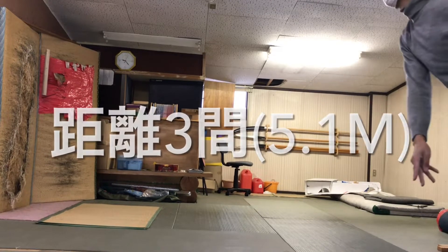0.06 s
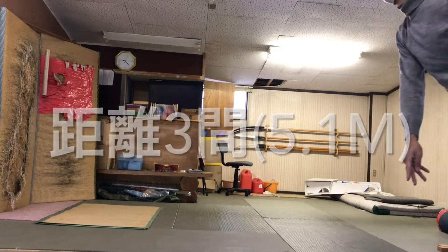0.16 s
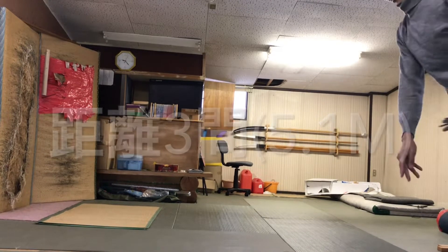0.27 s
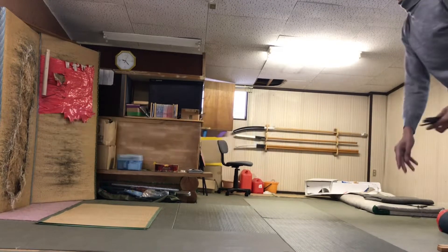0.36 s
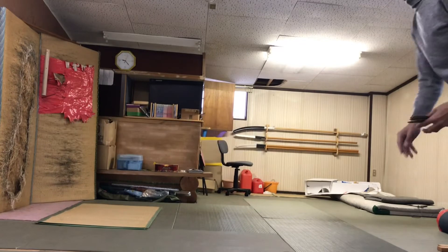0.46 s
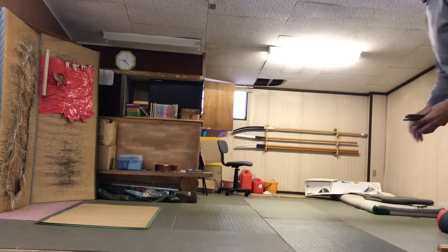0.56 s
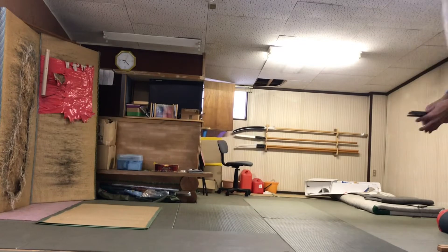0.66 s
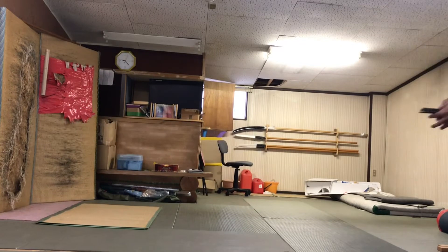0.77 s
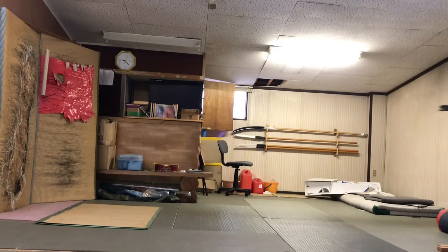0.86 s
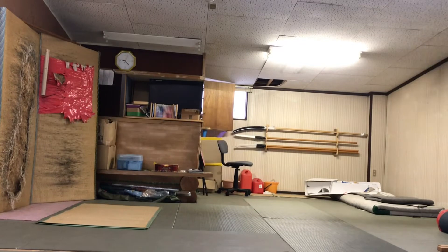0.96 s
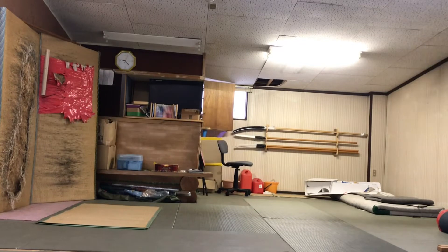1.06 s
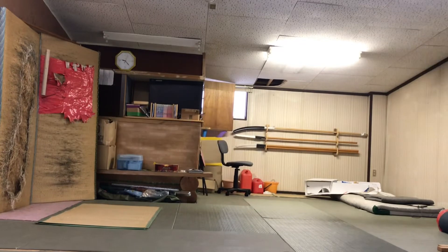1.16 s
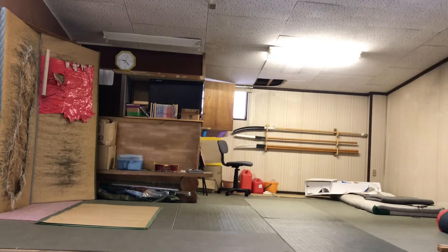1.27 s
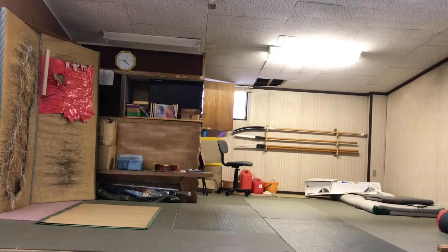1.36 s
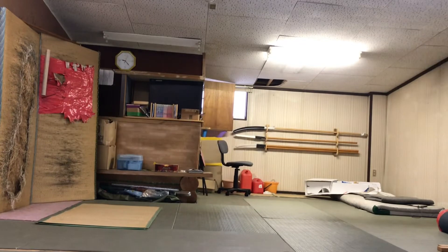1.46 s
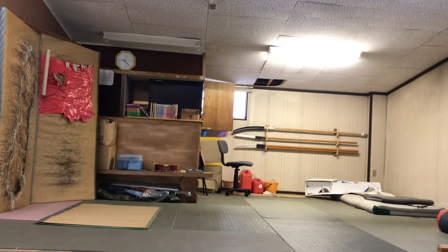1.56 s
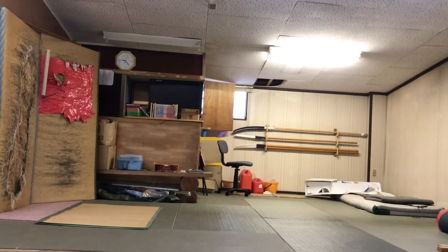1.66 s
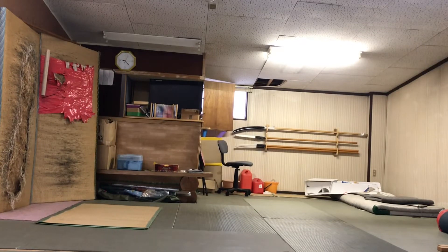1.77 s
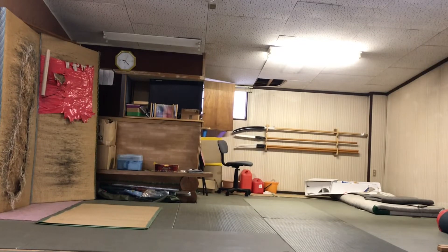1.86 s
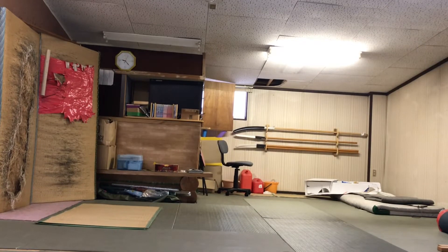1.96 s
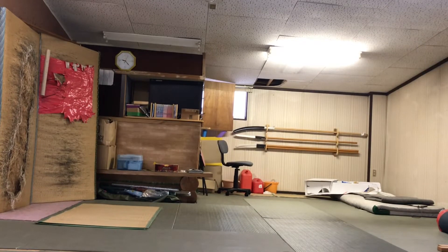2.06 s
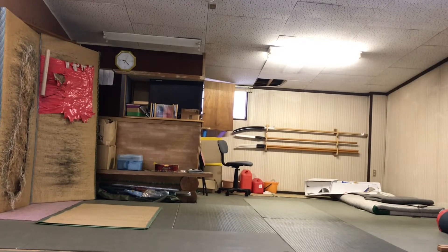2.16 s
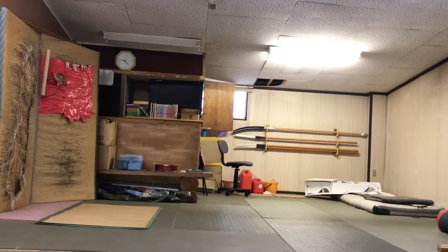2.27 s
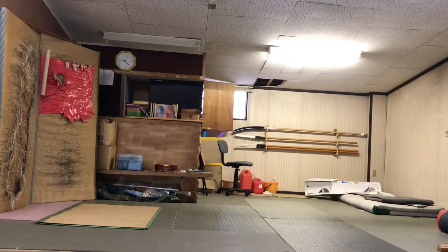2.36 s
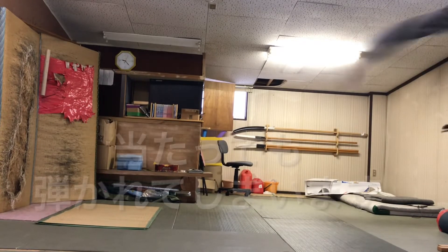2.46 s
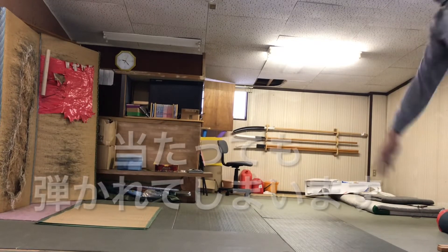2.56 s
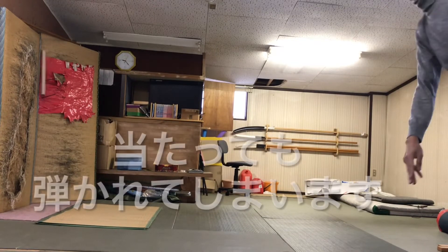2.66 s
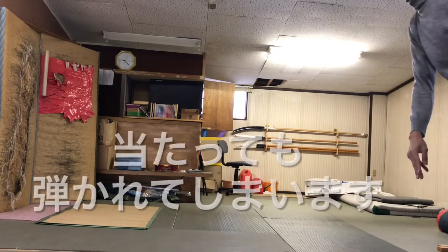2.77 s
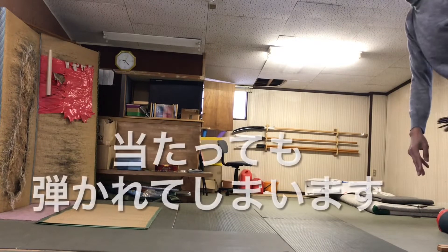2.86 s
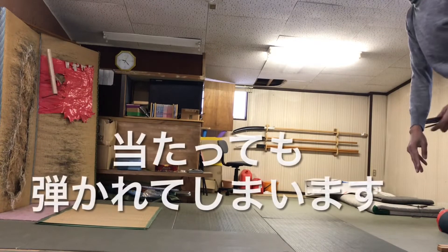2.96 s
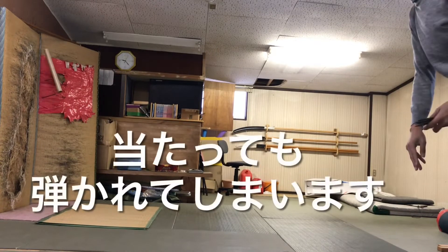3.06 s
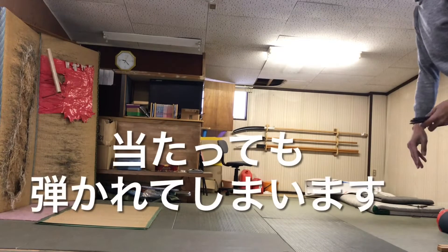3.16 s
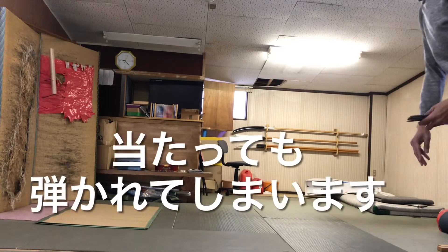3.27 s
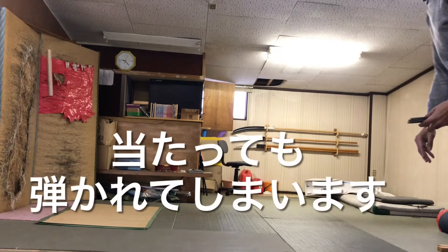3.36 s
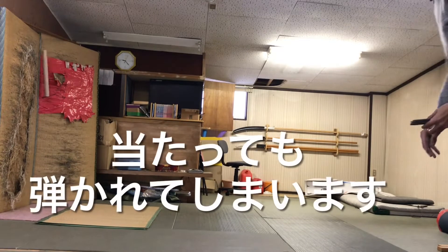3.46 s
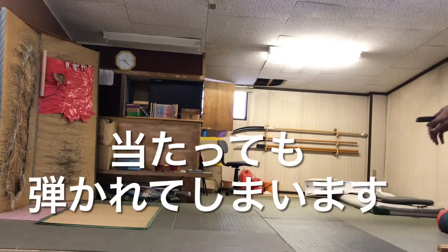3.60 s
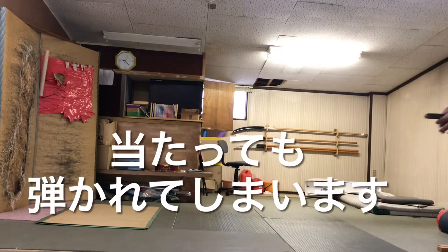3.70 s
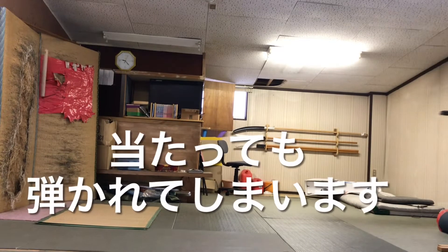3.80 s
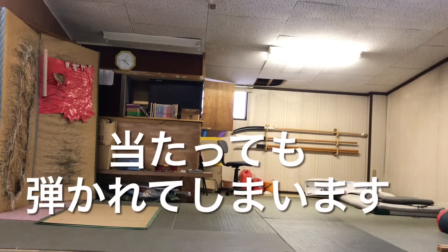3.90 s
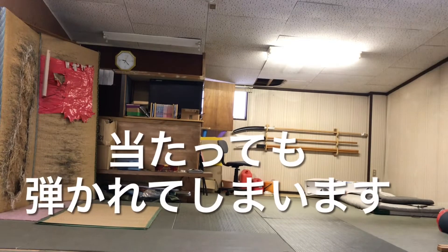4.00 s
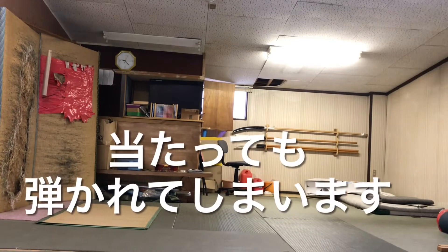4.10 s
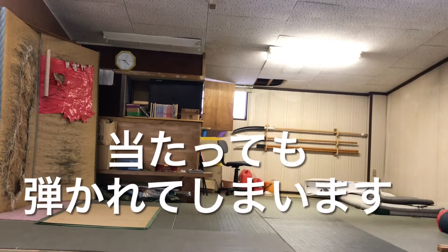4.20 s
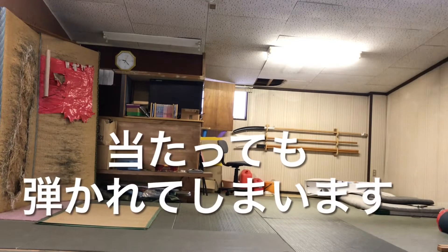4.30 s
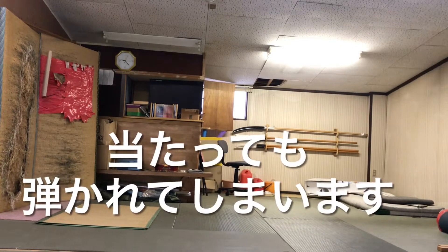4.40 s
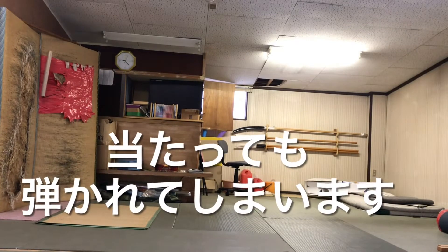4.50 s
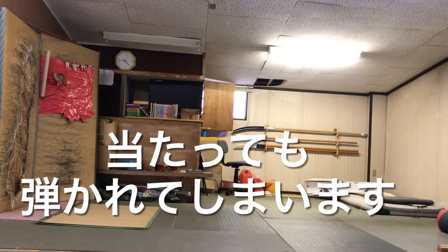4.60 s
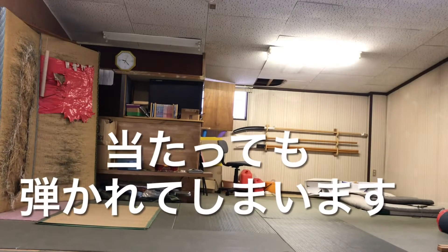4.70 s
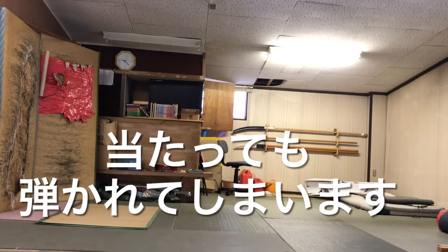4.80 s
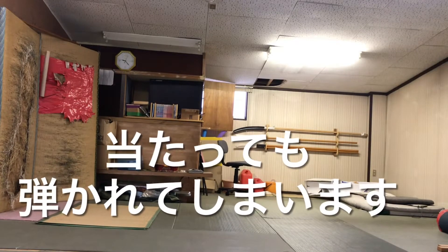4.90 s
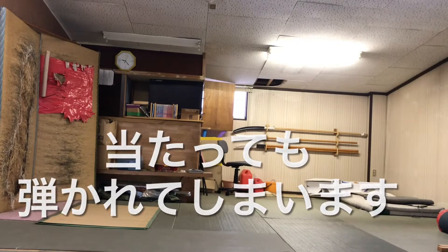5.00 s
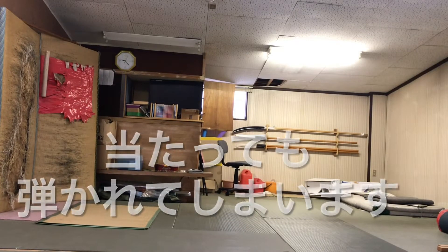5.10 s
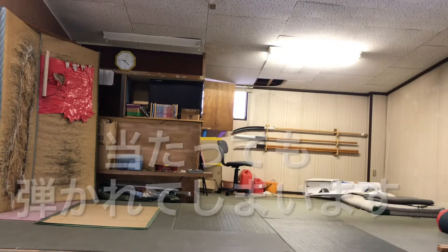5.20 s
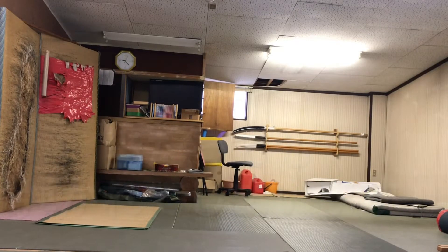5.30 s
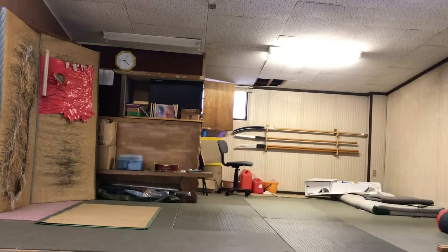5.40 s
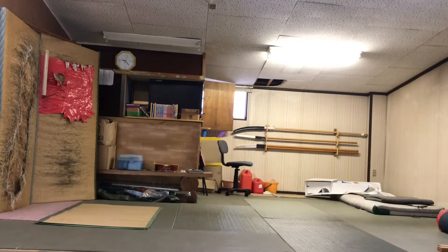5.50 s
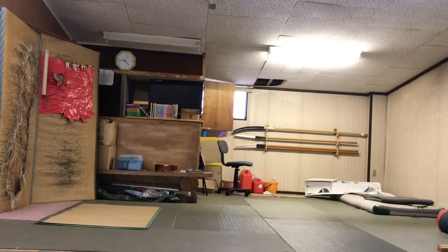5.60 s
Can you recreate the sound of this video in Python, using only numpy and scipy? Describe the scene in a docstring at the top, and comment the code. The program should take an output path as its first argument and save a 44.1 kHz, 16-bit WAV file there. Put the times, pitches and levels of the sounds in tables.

```python
"""Small hall: a steel throwing spike clacks off a hanging cardboard tube, tumbles ringing to the mat,
bounces and slides. Feet scuff the mats and small steel ticks and clinks sound over a low rumble and air.
Blows are short filter responses, tube, boards and steel are decaying modes, rubs are shaped noise;
the hall answers each event with smeared echoes and a diffuse tail."""
import sys
import numpy as np
from scipy import signal
from scipy.fft import rfft, irfft, next_fast_len
from scipy.io import wavfile
from scipy.ndimage import uniform_filter1d

SR = 44100
rng = np.random.default_rng(int(sys.argv[2]) if len(sys.argv) > 2 else 0)


def file_out(sig):
    """Save sig as 16-bit WAV at sys.argv[1]."""
    # one column per channel
    cols = np.atleast_2d(sig).T
    # limit, then scale
    lim = np.clip(cols, -1, 1)
    pcm = np.round(lim * 32767).astype(np.int16)
    wavfile.write(sys.argv[1], SR, pcm)


N = 249165
LEAD = SR // 10  # samples ahead of time zero, cut off in scene()

# tick of the steel: (frequency [Hz], relative level [dB])
TICK_COLOUR = [(1000, -37), (3000, 7.5), (5000, 4.5), (9000, 4.5), (12000, 7.5), (14000, 7), (16000, 16)]


def undb(db):
    """Decibels to amplitude."""
    return 10 ** (np.asarray(db) / 20)


def unit(x):
    """Scale to rms 1."""
    return x / np.sqrt(np.mean(x ** 2))


def over_hz(table, hz):
    """Table values joined on a log-frequency axis."""
    table_hz, values = np.transpose(table)
    return np.interp(np.log(np.maximum(hz, 1)), np.log(table_hz), values)


def band(centre_hz, width_hz, size, order=2):
    """Band-passed noise, rms 1; the centre is the geometric mean of the edges."""
    low_hz = np.sqrt(centre_hz ** 2 + width_hz ** 2 / 4) - width_hz / 2
    high_hz = min(low_hz + width_hz, .45 * SR)
    sos = signal.butter(order, [low_hz, high_hz], "bandpass", fs=SR, output="sos")
    return unit(signal.sosfilt(sos, rng.standard_normal(size)))


def above(x, low_hz):
    """High-pass: removes the low click of sounds that start abruptly."""
    return signal.sosfilt(signal.butter(3, low_hz, "highpass", fs=SR, output="sos"), x)


def blow(colour, size=4096, rough=.45):
    """One contact: minimum-phase response of the given colour, spread by three allpasses; peak 1."""
    bins_hz = np.arange(size // 2 + 1) * SR / size
    # folding the cepstrum makes the response causal
    cepstrum = irfft(np.log(undb(over_hz(colour, bins_hz))))
    cepstrum[1:size // 2] *= 2
    cepstrum[size // 2 + 1:] = 0
    y = irfft(np.exp(rfft(cepstrum)))
    for lag in rng.integers(3, 20, size=3):
        # an allpass spreads the blow in time and leaves its colour
        a = np.r_[1, np.zeros(lag - 1), -rough]
        y = signal.lfilter(a[::-1], a, y)
    return y / np.abs(y).max()


def ring(modes, length_s):
    """Decaying sines (Hz, dB, t60 s), random starting phases, 4 ms fade at the end."""
    t = np.arange(int(length_s * SR)) / SR
    hz, db, t60_s = np.transpose(modes)[:, :, None]
    phase = 2 * np.pi * rng.random((len(modes), 1))
    decay = (hz < .45 * SR) * undb(db - 60 * t / t60_s)
    waves = decay * np.sin(2 * np.pi * hz * t + phase)
    return waves.sum(0) * np.minimum(1, (length_s - t) / .004)


def spike(db, bright_db, low_db, t60_s, third_hz, length_s, split=.003):
    """One steel bar bending in two planes at slightly different pitches; bright_db tilts the upper modes."""
    # bending modes of a free bar, scaled to third_hz: frequency [Hz]
    bar_hz = [872, 2350, 4497, 7245, 10645, 14575, 19000]
    # the same modes: (relative level [dB], share of t60 [ratio])
    bar = [(-20, .6), (0, 1), (0, 1.3), (-4, .9), (-6, .8), (-4, .75), (-8, .6)]
    modes = []
    for hz, (mode_db, share) in zip(bar_hz, bar):
        octave = np.log2(hz / bar_hz[2])
        tilt_db = bright_db * octave if octave >= 0 else low_db
        pitch_hz = hz * third_hz / bar_hz[2]
        for side in (-1, 1):
            modes.append((pitch_hz * (1 + side * split), db + mode_db + tilt_db, t60_s * share))
    return ring(modes, length_s)


def add(track, s, sound):
    """Mix a sound into the track at s seconds."""
    i = LEAD + int(s * SR)
    track[i:i + len(sound)] += sound[:len(track) - i]


def hall(x, wet_db, echoes=(), scatter_s=.0005):
    """Direct sound, echoes smeared by rough walls, and a diffuse tail with t60 set by frequency."""
    # tail decay: (frequency [Hz], t60 [s])
    hall_t60 = [(60, 1), (250, 0.42), (1000, 0.37), (2500, 0.54), (5000, 0.45), (9000, 0.36), (15000, 0.21)]
    t = np.arange(int(.9 * SR)) / SR
    tail = np.zeros(len(t))
    for hz in 50 * 2 ** np.arange(0, 8.6, .5):
        tail += np.sqrt(hz) * band(hz, hz / 2.7, len(t)) * undb(-60 * t / over_hz(hall_t60, hz))
    tail *= 1 - np.exp(-t / 0.0074)  # gradual build-up
    tail *= undb(wet_db) / np.sqrt(np.sum(tail ** 2))
    tail[0] = 1  # direct sound
    for delay_s, db in echoes:
        smear = rng.standard_normal(len(t)) * (t >= delay_s) * np.exp(-np.abs(t - delay_s) / scatter_s)
        tail += undb(db) * smear / np.sqrt(np.sum(smear ** 2))
    return signal.fftconvolve(x, tail)[:len(x)]


def background():
    """Room air and microphone hiss as shaped noise, a wavering low rumble and a fainter murmur near 250 Hz."""
    # air and hiss: (frequency [Hz], relative density [dB])
    air_colour = [(53, -30), (90, -4), (210, -9.5), (249, -20.5), (303, -19), (593, -16), (647, -21),
                  (1020, -22), (16000, -35.5)]
    # low rumble with the low tails of the blows: (time [s], level before waver [dB])
    rumble = [(0.0, -56), (0.05, -54), (0.24, -80), (1.12, -63), (1.16, -75.5), (2.2, -59.5), (2.49, -74),
              (2.52, -55), (2.66, -68), (2.74, -50), (2.93, -64.5), (4.53, -52.5), (4.56, -63.5),
              (4.99, -45), (5.27, -60), (5.33, -52.5), (5.6, -51), (5.65, -54)]
    # murmur of noise around 250 Hz: (time [s], level [dB])
    murmur = [(0, -66), (1.6, -71.5), (3.2, -64.5), (4.3, -68), (5.0, -63.5), (5.65, -65)]
    air_db, waver_hz, waver_db = -67.5, 6, 2.5
    size = next_fast_len(N)
    hz = np.arange(size // 2 + 1) * SR / size
    spectrum = rfft(rng.standard_normal(size)) * undb(over_hz(air_colour, hz)) * (hz > 30)
    air = unit(irfft(spectrum, size)[:N])
    t = np.arange(N) / SR
    waver = band(waver_hz, waver_hz, N, order=1)
    rumble_db = np.interp(t, *np.transpose(rumble)) + waver_db * waver
    low = undb(rumble_db) * band(52, 32, N, order=3)
    mid = undb(np.interp(t, *np.transpose(murmur))) * band(250, 180, N, order=1)
    return undb(air_db) * air + low + mid


def landings():
    """Spike on mat or board: dull thud, ringing boards, bright steel tick; first an earlier blow dies away."""
    # contacts: (time [s], thud level [dB], tick level [dB])
    contacts = [(3.3711, -17, -14), (3.6726, -35.5, -24.5), (3.85, -70, -50), (3.917, -74, -47),
                (4.112, -47, -42), (4.118, -63, -45)]
    # blow of an earlier throw: (frequency [Hz], relative level [dB])
    earlier_colour = [(47, -56), (80, -16.5), (563, 0), (820, -10), (958, -9.5), (1400, -12), (2040, -14),
                      (2900, -16.5), (9000, -24.5), (16000, -19)]
    # mat thud: (frequency [Hz], relative level [dB])
    thud_colour = [(47, -61), (80, -33), (128, -6), (346, -10.5), (496, -15), (616, 1), (2430, -16),
                   (2860, -18), (6000, -24), (7800, -35), (13200, -120)]
    # boards under the mat: (frequency [Hz], relative level [dB], t60 [s])
    boards = [(154.4, -11, 0.12), (208.4, -9.5, 0.17), (245.6, -5.5, 0.13), (343.6, -4.5, 0.072),
              (419, -6, 0.067), (596, -8.5, 0.072), (798, -10, 0.069)]
    # first echoes: (delay [s], level [dB])
    mat_echoes = [(.0052, -4), (.014, -8), (.0205, -3), (.0252, -6), (.033, -8), (.0365, -8)]
    earlier_s, earlier_peak_db = -0.046, -17
    boards_re_thud_db, mat_low_hz = -0.5, 123
    mat_wet_db, boards_wet_db = 10, -2
    x, before, floor = np.zeros((3, N + LEAD))
    add(before, earlier_s, undb(earlier_peak_db) * blow(earlier_colour))
    for s, thud_db, tick_db in contacts:
        add(x, s, undb(thud_db) * blow(thud_colour))
        add(floor, s, undb(thud_db + boards_re_thud_db) * ring(boards, .3))
        add(x, s, undb(tick_db) * blow(TICK_COLOUR))
    contact_wet = hall(before + above(x, mat_low_hz), mat_wet_db, mat_echoes)
    return contact_wet + hall(above(floor, mat_low_hz), boards_wet_db)


def clinks():
    """Small steel ticks and clinks: quickly damped bars, with a wavering level."""
    # touches: (time [s], ring level before waver [dB], brightness [dB per octave], low modes [dB],
    # t60 [s], third mode [Hz], tick level [dB])
    touches = [(0.881, -69.5, 14, -30, 0.058, 4540, -29.5), (0.8797, -80, 19, -24, 0.046, 4000, -52),
               (0.881, -68, 0, -28, 0.041, 5170, -62), (1.0555, -75, 11.5, -26, 0.12, 4980, -31),
               (3.0703, -41, -7, -11, 0.022, 4530, -29), (5.145, -70, -2.5, -28.5, 0.13, 5200, -69),
               (5.403, -76, -3.5, 2, 0.13, 4783, -37), (5.405, -72, 11.5, -31, 0.085, 5030, -66),
               (5.441, -76.5, 4.5, 4.5, 0.23, 4725, -41), (5.536, -59, 13, -31, 0.073, 4790, -26),
               (5.548, -76, -3, -1, 0.087, 4762, -46), (5.591, -74, 11, -34, 0.085, 4520, -48.5)]
    # first echoes: (delay [s], level [dB])
    clink_echoes = [(.003, -4.5), (.007, -2.5), (0.012, -4), (0.02, -14)]
    tick_low_hz, clink_wet_db, waver_db = 4100, 2, 2.34
    rings, ticks = np.zeros((2, N + LEAD))
    for s, *contact, tick_db in touches:
        add(rings, s, spike(*contact, 0.34, split=0.0049))
        add(ticks, s, undb(tick_db) * blow(TICK_COLOUR))
    waver = undb(waver_db * band(82, 145, N + LEAD, order=1))
    return hall(rings * waver + above(ticks, tick_low_hz), clink_wet_db, clink_echoes)


def rubs(catch_db=0.5, catch_s=0.011):
    """Feet, sleeve and spike rub woven stuff: the weave catches and slips, the ridge hum sinks as it slows."""
    # strokes: (start [s], rise [s], hold [s], fade [dB per s], ridge pitch at full level [Hz],
    # hum half width [Hz], hum [dB], rasp [dB], hiss [dB], low drag [dB])
    strokes = [(1.06, 0.053, .06, 61, 742, 151, -58, -55.5, -60.5, -78),
               (1.167, .07, 0.037, 151, 981, 150, -55, -61, -80, -89),
               (1.316, 0.02, 0.037, 170, 903, 140, -54.5, -56, -61.5, -62.5),
               (2.211, 0.024, 0.018, 116.5, 577, 200, -73, -71.5, -68, -88),
               (2.389, 0.024, 0.0078, 145.5, 585, 200, -70, -66, -67, -90),
               (2.437, .04, .07, 90, 572, 50.4, -54.5, -65, -61, -61),
               (2.596, 0.11, 0.08, 200, 584, 250, -64.5, -56.5, -61, -49.5),
               (3.519, 0.016, .01, 295.5, 900, 400, -54, -55, -64, -64),
               (3.617, .03, .02, 153, 951, 400, -47, -50.5, -66, -69),
               (3.723, 0.016, 0.0085, 200.5, 1000, 400, -50, -50, -74, -66),
               (3.801, 0.042, .02, 120, 998, 400, -44, -48.5, -54, -65),
               (3.889, .04, .02, 111, 1005, 394, -45, -47, -54, -80),
               (4.025, 0.026, 0.041, 100, 950.5, 344, -45, -48, -52, -72),
               (4.101, 0.022, 0.0084, 398.5, 996, 400, -43.5, -46, -41.5, -72),
               (4.167, .02, .15, 89.5, 900.6, 350, -58, -56.5, -58, -64)]
    # rasp, hiss, drag: (centre [Hz], width [Hz])
    rub_bands = [(3060, 4400), (11800, 14000), (230, 240)]
    start_db, end_db = -18, -30  # relative to full level
    sag, wet_db = .2, -11  # sag: share of pitch lost at end_db
    x = np.zeros(N + LEAD)
    for s, rise_s, hold_s, fade, ridge_hz, half_width_hz, hum_db, *levels_db in strokes:
        corners_s = np.cumsum([0, rise_s, hold_s, -end_db / fade])
        t = np.arange(0, corners_s[-1], 1 / SR)
        stroke_db = np.interp(t, corners_s, [start_db, 0, 0, end_db])
        catch = unit(uniform_filter1d(rng.standard_normal(len(t)), int(catch_s * SR)))
        # hum: slow noise carried on the ridge frequency
        phase = 2 * np.pi * np.cumsum(ridge_hz * (1 - sag * stroke_db / end_db)) / SR
        b, a = signal.butter(1, half_width_hz, fs=SR)
        slow = signal.lfilter(b, a, rng.standard_normal((2, len(t))))
        mix = undb(hum_db) * unit(slow[0] * np.cos(phase) + slow[1] * np.sin(phase))
        for (hz, width_hz), db in zip(rub_bands, levels_db):
            mix += undb(db) * band(hz, width_hz, len(t))
        add(x, s, mix * undb(stroke_db + catch_db * catch))
    return hall(x, wet_db)


def thrown():
    """The spike rings, each contact stopping the ring before; uneven tumbling makes the level flutter."""
    # contacts: (time [s], level before flutter [dB], brightness [dB per octave], low modes [dB],
    # t60 [s], third mode [Hz])
    contacts = [(2.461, -79.5, 11.5, -15, 1.3, 4394), (2.7002, -54.5, -7.5, -2.5, 3.6, 4473),
                (3.0705, -63, -24, -3, 2.5, 4434), (3.372, -51.5, 2.5, -3, 1.8, 4520),
                (3.6734, -59, 1, -20, 3.2, 4476), (4.118, -42, 3, -13, 0.12, 4497)]
    tumble_hz, tumble_db, wet_db = 45, 2.5, -10
    x = np.zeros(N + LEAD)
    ends_s = [row[0] for row in contacts[1:]] + [contacts[-1][0] + .4]
    for (s, *contact), end_s in zip(contacts, ends_s):
        add(x, s, spike(*contact, end_s - s))
    flutter = undb(tumble_db * band(tumble_hz, tumble_hz, len(x), order=1))
    return hall(x * flutter, wet_db)


def tube():
    """The tip cracks on cardboard, the tube wall rings and the padded board behind booms late."""
    # crack: (frequency [Hz], relative level [dB])
    clack_colour = [(59, -64.5), (100, -36.5), (302, -29.5), (676, -6.5), (872, -23), (1100, -6),
                    (1420, -17), (1950, -12), (2170, -18), (3050, -9.5), (4290, -17.5), (4870, -13),
                    (16000, -27)]
    # tube wall modes: frequency [Hz]
    wall_hz = [250, 500, 727, 1100, 1222, 2003, 2464, 2735, 2832, 2947, 3096, 3690]
    # the same modes: (relative level [dB], t60 [s])
    wall_modes = [(-17.5, 0.049), (-5.5, 0.036), (-18, 0.084), (0.5, 0.15), (-15.5, 0.058), (-9, 0.12),
                  (-7.5, .06), (-10.5, .04), (-17.5, .04), (-10.5, 0.078), (-7.5, 0.16), (-15.5, 0.027)]
    # padded board: (frequency [Hz], level before build-up [dB], t60 [s])
    backing = [(62.1, -50, 0.22), (88, -47.5, 0.19), (120, -51.5, 0.11)]
    # first echoes: (delay [s], level [dB])
    tube_echoes = [(.0012, -1), (.0026, -1), (.0087, 0), (.0105, -1), (.0195, -4), (.0275, -5), (.044, -10)]
    clack_s, clack_peak_db, wall_db = 2.6992, -0.88, -10
    backing_lag_s, wall_low_hz = .012, 190
    crack_wet_db, wall_wet_db = 6, -3
    crack, wall = np.zeros((2, N + LEAD))
    add(crack, clack_s, undb(clack_peak_db) * blow(clack_colour))
    add(wall, clack_s, undb(wall_db) * ring(np.c_[wall_hz, wall_modes], 0.45))
    boom = ring(backing, .4)
    build_up = 1 - np.exp(-np.arange(len(boom)) / SR / backing_lag_s)
    add(crack, clack_s, boom * build_up)
    return hall(crack, crack_wet_db, tube_echoes) + hall(above(wall, wall_low_hz), wall_wet_db)


def scene():
    """Sum of all events and the background, one channel."""
    events = landings() + clinks() + rubs() + thrown() + tube()
    return (events[LEAD:] + background())[None]


def record(dry):
    """Steep elliptic low-pass cuts the top."""
    top_hz = 15900
    return signal.sosfilt(signal.ellip(10, .3, 100, top_hz, fs=SR, output="sos"), dry)


dry = scene()
out = record(dry)
file_out(out)
```